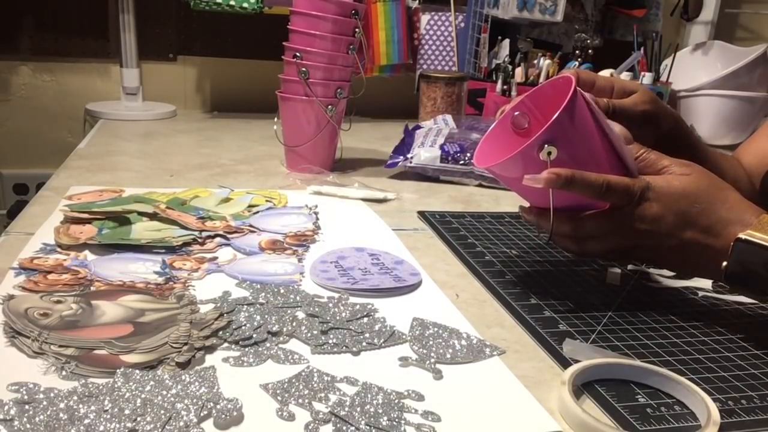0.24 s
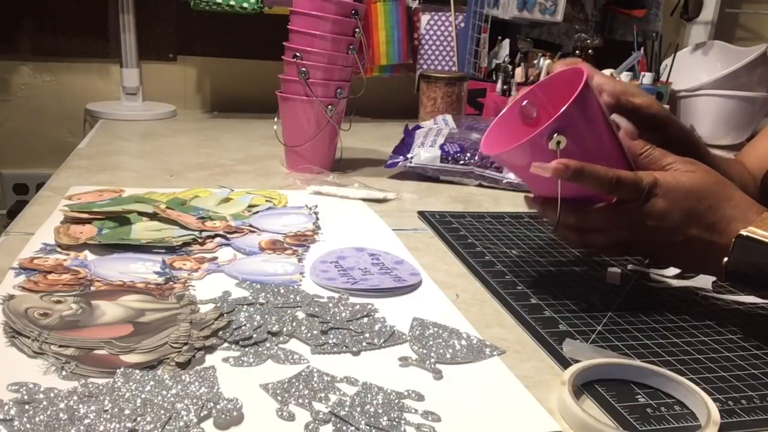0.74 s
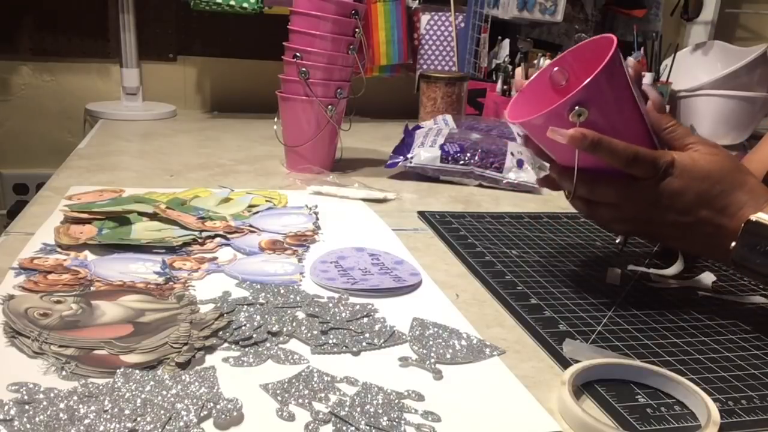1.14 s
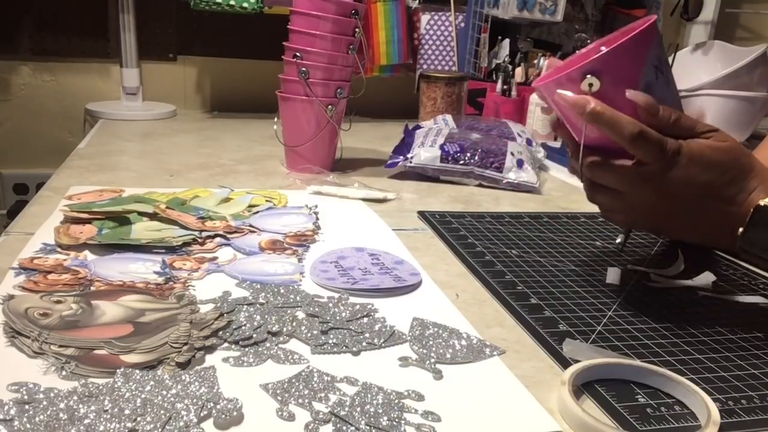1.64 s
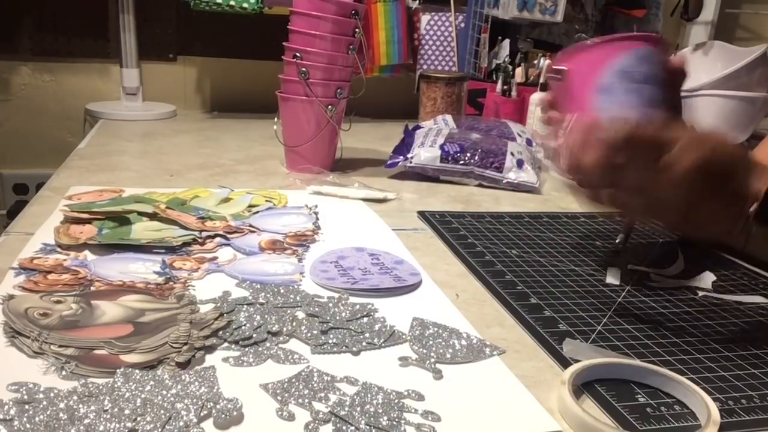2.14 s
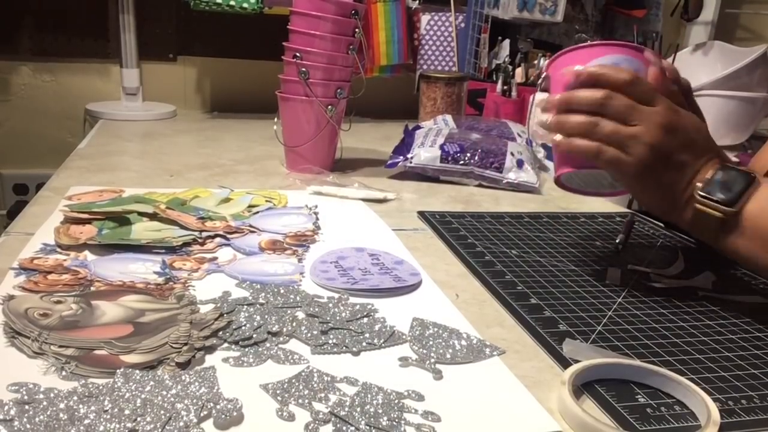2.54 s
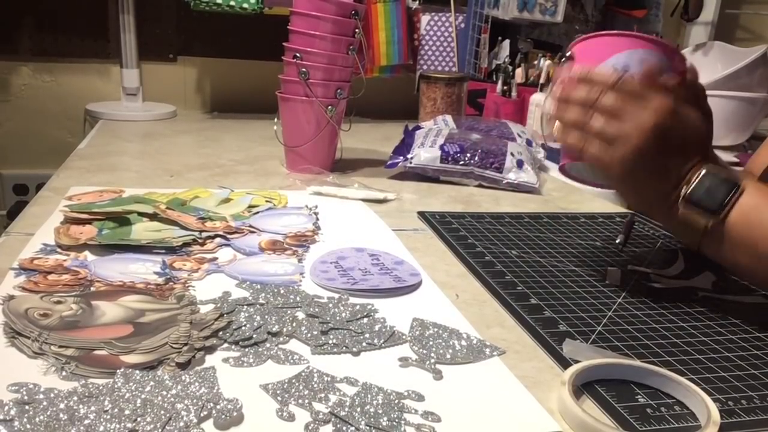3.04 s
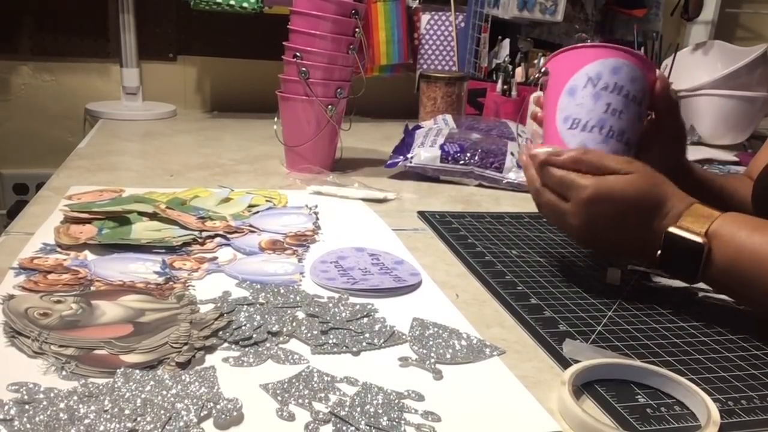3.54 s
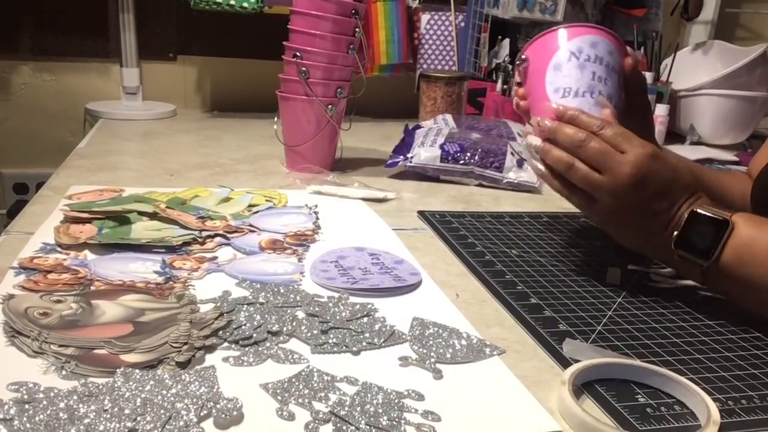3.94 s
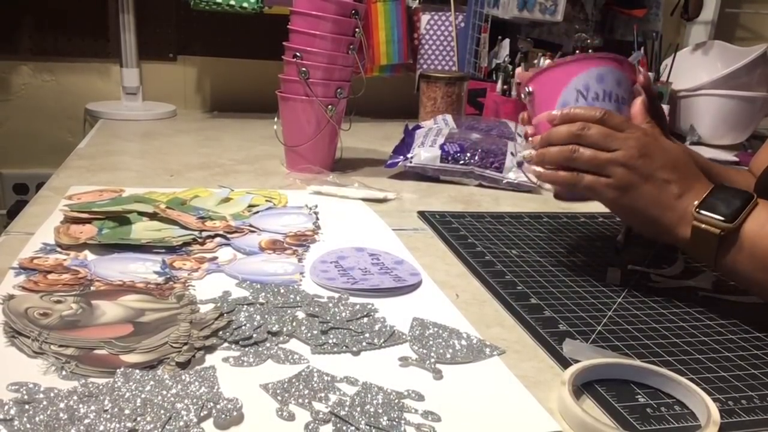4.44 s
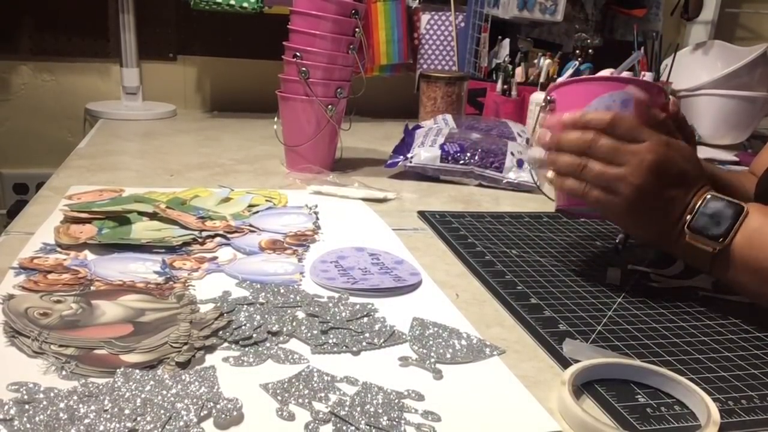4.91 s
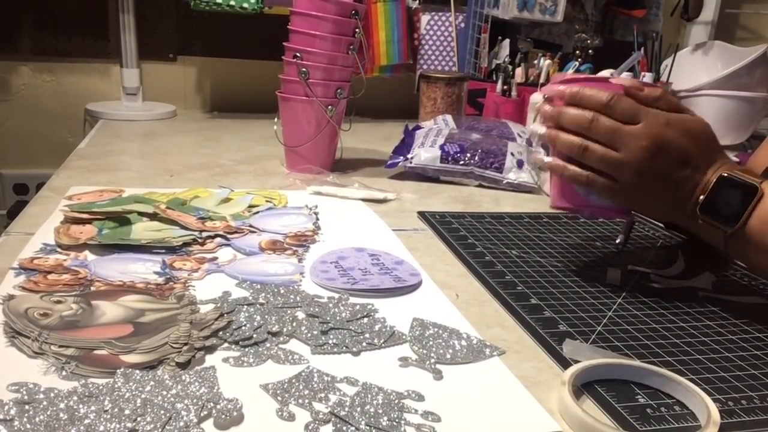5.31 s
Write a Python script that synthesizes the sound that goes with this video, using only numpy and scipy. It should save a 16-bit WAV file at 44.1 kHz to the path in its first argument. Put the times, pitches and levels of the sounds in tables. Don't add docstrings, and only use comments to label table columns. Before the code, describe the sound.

A small thin metal pail is turned in two hands indoors, its wire handle clinking and rattling in short bursts over faint hum.

```python
import sys
import numpy as np
from scipy import signal
from scipy.fft import rfft, irfft
from scipy.io import wavfile
from scipy.ndimage import uniform_filter1d

SR = 44100
rng = np.random.default_rng(int(sys.argv[2]) if len(sys.argv) > 2 else 0)


def digitize_waveform(pressure):
    field = np.atleast_2d(pressure).T
    bounded = np.clip(field, -1, 1)
    quanta = np.round(bounded * 32767).astype(np.int16)
    wavfile.write(sys.argv[1], SR, quanta)


def volts_from_db(level):
    exponent = np.asarray(level, float) / 20
    return 10 ** exponent


N = 245813
SPLIT_HZ = 1800, 6000


def fade(t, t60):
    return np.exp(-np.log(1000) * t / max(t60, 1e-3))


def unit(x):
    return x / np.sqrt(np.mean(x ** 2))


def colour(x, points):
    hz, db = np.transpose(points)
    f = np.maximum(np.fft.rfftfreq(len(x), 1 / SR), 1)
    return irfft(rfft(x) * volts_from_db(np.interp(np.log(f), np.log(hz), db)), len(x))


def ring(x, hz, t60):
    pole = np.exp(2j * np.pi * hz / SR - np.log(1000) / (max(t60, 1e-3) * SR))
    return signal.lfilter([0, pole.imag], [1, -2 * pole.real, abs(pole) ** 2], x)


def walk(rate):
    hold = int(SR / rate)
    steps = np.repeat(rng.standard_normal(N // hold + 1), hold)
    return unit(uniform_filter1d(uniform_filter1d(steps, hold), hold)[:N])


def registers(points, count):
    bands = []
    for hz, kind in (SPLIT_HZ[0], "low"), (SPLIT_HZ, "band"), (SPLIT_HZ[1], "high"):
        noise = colour(rng.standard_normal(count), points[:-1])
        sos = signal.butter(2, hz, kind, fs=SR, output="sos")
        bands.append(unit(signal.sosfilt(sos, noise)))
    return bands


STRIKES = [(0.9012, -36, 6.5, 0.044), (1.103, -30.5, -4, 0.06), (1.1675, -40, -1, 0.065),
           (1.2337, -31, -2.5, 0.024), (1.6615, -57, 12, 0.035), (2.03, -27, -6.5, 0.014),
           (2.0075, -52.5, -3.5, 0.022), (1.831, -34, 2.5, 0.064), (1.9287, -23.5, 4.5, 0.015),
           (1.932, -21.5, -15, 0.075), (1.966, -28, -17, 0.055), (2.146, -31, -5.5, 0.065),
           (2.201, -11, -5.5, 0.036), (2.2437, -29.5, 2, 0.067), (3.027, -41.5, 10.5, 0.011)]
RATTLES = [(0.6796, -44.5, -25, 0.056), (0.811, -48.5, -14, 0.051), (0.9256, -29, 11, 0.01),
           (1.112, -32, -1.5, 0.016), (1.199, -65, -4, 0.021), (1.2454, -59, -8, 0.033),
           (1.8187, -40, -34, 0.042), (1.852, -32.5, -8, 0.13), (1.879, -30, -7.5, 0.038),
           (1.9426, -20.5, -10, 0.023), (1.9868, -28, -1, 0.065), (2.024, -23.5, -3.5, 0.032),
           (2.094, -28.5, -19, 0.07), (2.395, -39, -8, 0.038), (2.534, -30.5, 2.5, 0.12),
           (3.196, -37, 6, 0.052), (3.983, -53, 2, 0.05), (4.6606, -40.5, -3.5, 0.032),
           (5.26, -34, 2.5, 0.094), (5.4094, -22, -3.5, 0.014), (5.419, -38.5, -7, 0.071),
           (2.5185, -30, 1, 0.024), (2.471, -36.5, 1, .05), (5.268, -39, 2, 0.028)]
TAPS = [(0.7205, -55.5, -29, 0.086), (2.379, -28, 0.5, 0.051), (2.511, -21, -1, 0.036),
        (2.9044, -31.5, 0, 0.082), (3.12, -41, -8, 0.032), (3.1421, -28, -3, 0.032),
        (3.461, -45.5, -7.5, 0.099), (3.615, -47.5, -2.5, 0.07), (3.998, -39.5, -9, 0.052),
        (4.062, -41.5, -13, 0.17), (4.755, -54, -18, 0.18), (4.996, -42.5, -5.5, 0.12),
        (5.056, -42, -11.5, 0.087), (5.399, -44, 1, 0.03)]
SLIDES = [
    (0.8755, -38.5, -6.5, 0.073),
    (1.053, -38, -2.5, 0.093),
    (1.763, -40.5, -11.5, 0.1),
    (2.347, -34, 0.5, 0.34),
    (2.463, -28.5, -2, 0.062),
    (3.173, -32, -2, 0.054),
    (4.2088, -57, 0, 0.071),
    (4.6493, -35, -11, 0.064),
    (4.807, -37.5, -10, 0.13),
]
# (rise [s], dull body share [dB])
KINDS = [
    (0.001, -30.5),
    (0.0045, -22.5),
    (0.001, -8),
    (0.0072, -16.5),
]
# (frequency [Hz], level [dB])
CRACK = [(410, -21), (560, -13), (780, -8.5), (1050, -21), (1340, -12), (1670, -12.5), (2100, -9.5),
         (3080, 0), (3460, -6), (4260, -2), (6100, -8), (7440, -6), (11100, -8), (15600, -17)]


def contacts():
    t = np.arange(6144) / SR
    count = N + len(t)
    noises = body, mid, high = registers(CRACK, count)
    grit = volts_from_db(4.5 * unit(uniform_filter1d(rng.standard_normal(count), size=50)))
    push = rng.standard_normal(count)
    mode_hz, mode_db = np.transpose(TIN)
    place = np.digitize(mode_hz, SPLIT_HZ)
    out = ticks(noises, count)
    for table, (rise, body_db) in zip((STRIKES, RATTLES, TAPS, SLIDES), KINDS):
        for s, db, high_db, t60 in table:
            at = slice(int(s * SR), int(s * SR) + len(t))
            spot, bend = rng.standard_normal((2, len(TIN)))
            swell = volts_from_db(db) * (1 - np.exp(-t / max(rise, 1e-4))) ** 2
            blow = fade(t, 0.00086 + 8 * rise)
            chatter = volts_from_db(-7) * grit[at] * fade(t, t60)
            force = swell * (blow + chatter)
            weight = swell * (blow + volts_from_db(-9.5) * chatter)

            share = volts_from_db(np.array([body_db + 10.5, 0, high_db + 6]))
            out[at] += volts_from_db(-12) * weight * share[0] * body[at]
            out[at] += volts_from_db(-12) * force * (mid[at] + share[2] * high[at])

            gains = share[place] * volts_from_db(1.03 * mode_db + 2.2 * spot + 1.5)
            out[at] += wall(force * push[at], gains, 1 + 0.01 * bend, t60=0.025)
    return out[:N]


# (frequency [Hz], level [dB])
TIN = [(1715, -3), (2450, -3.5), (2990, -5), (3230, -7.5), (3800, -12.5), (4100, -7.5), (4450, -9),
       (4810, -13), (5400, -9.5), (6600, -10.5), (6850, -9.5), (8100, -8), (8390, -3.5), (9500, -4),
       (10850, -4.5), (12150, -6.5)]


def wall(x, gains, detune, t60):
    f = np.fft.rfftfreq(len(x), 1 / SR)
    hz = np.array(TIN)[:, :1] * detune[:, None]
    width = np.log(1000) / (2 * np.pi * t60) * np.maximum(hz / 3500, 1) ** 1.2
    response = np.sum(gains[:, None] * width / (width + 1j * (f - hz)), axis=0)
    return irfft(rfft(x) * response, len(x))


# (time [s], level [dB], treble share [dB])
TICKS = [(0.9017, -40, -9), (0.9273, -37.5, -5), (1.108, -37.5, -8), (1.112, -39.5, -3), (1.2343, -41.5, 1),
         (1.6646, -61.5, 12), (1.838, -41, -2), (1.9296, -33, 5), (1.934, -36, -4), (1.9457, -29.5, -6),
         (1.958, -51, -4), (1.97, -34.5, -3), (1.99, -33.5, -4), (2.008, -45.5, -8), (2.0276, -35.5, -14),
         (2.035, -38, -2), (2.209, -47, -2), (2.217, -38, 5), (2.3543, -45, 7), (2.383, -38, -6),
         (2.403, -39.5, 2), (2.465, -45, -2), (2.4704, -47, -6), (2.5133, -35, -7), (2.52, -39, -9),
         (2.528, -37, 2), (2.541, -38, 0), (2.9066, -38.5, -2.5), (2.912, -49, 3), (3.0267, -49, 8),
         (3.034, -56, 16), (3.041, -61, 16), (3.197, -43, -5), (3.623, -53, -6), (4.821, -49, -9),
         (5.004, -52, -10), (5.064, -48.5, -15), (5.2647, -37.5, -5), (5.29, -45, 4), (5.4133, -35, -7),
         (5.422, -50, -8)]


def ticks(noises, count):
    body, mid, high = noises
    out, t = np.zeros(count), np.arange(6144) / SR
    peak_s = 0.00052
    pulse = t / peak_s * np.exp(1 - t / peak_s)
    for s, db, high_db in TICKS:
        at = slice(int(s * SR), int(s * SR) + len(t))
        out[at] += volts_from_db(db) * pulse * (mid[at] + volts_from_db(high_db) * high[at] + volts_from_db(-14) * body[at])
    return out


# (time [s], level [dB],
# frequency [Hz], t60 [s])
RINGS = [(0.901, -44, 4750, .04), (0.901, -29, 3160, .04), (0.908, -33, 2520, 0.085),
         (0.929, -34.5, 4770, 0.079), (0.931, -47, 5545, 0.087), (0.932, -45, 2450, 0.1),
         (0.953, -57, 3000, 0.25), (1.058, -46, 2430, 0.14), (1.058, -43, 3050, 0.24),
         (1.062, -42, 5350, 0.17), (1.105, -34, 2590, 0.04), (1.113, -25.5, 5430, 0.032),
         (1.113, -46, 4100, 0.072), (1.665, -59, 4500, 0.84), (1.932, -16, 4400, 0.033),
         (1.944, -28, 2994, .3), (1.948, -27.5, 2450, 0.47), (1.962, -32, 2990, .3),
         (1.968, -31, 4850, .08), (2.0, -34, 2490, 0.38), (2.005, -33, 3100, 0.055),
         (2.018, -30, 3160, 0.05), (2.202, -12, 2620, 0.024), (2.208, -22, 4680, 0.089),
         (2.21, -31, 3220, 0.21), (2.215, -34, 4410, 0.23), (2.245, -46, 8100, 0.15),
         (2.378, -36, 2970, 0.081), (2.513, -35.5, 1713, .26), (2.513, -36, 3060, .15),
         (2.518, -28.5, 4134, 0.24), (2.52, -32, 5378, 0.19), (2.513, -29, 6756, 0.15),
         (2.908, -36.5, 3940, .3), (2.906, -35, 6800, 0.14), (2.912, -41, 8360, .15),
         (3.028, -34.5, 4280, 0.037), (3.028, -41, 2080, 0.027), (3.198, -40, 6500, 0.11),
         (3.198, -46.5, 2500, 0.11), (5.264, -32.5, 6880, 0.047), (5.266, -34, 4090, 0.28),
         (5.268, -37.5, 5400, 0.22), (5.277, -40, 3040, 0.23), (5.413, -20.5, 2645, 0.021),
         (5.413, -44, 6900, 0.12), (5.416, -38, 3020, 0.13), (5.425, -58, 5000, 0.15),
         (1.735, -57, 4500, .25), (1.764, -48, 3200, 0.087), (1.775, -45, 4450, .12),
               (1.778, -53, 2940, 0.11), (1.78, -55, 1716, 0.13), (1.817, -41.5, 3100, 0.094),
               (1.817, -48, 3950, .08), (1.832, -33.5, 4000, .06), (1.832, -38, 2516, .08),
               (1.833, -37, 8230, .15), (1.851, -39, 3050, 0.12), (1.847, -36.5, 4560, 0.11),
               (1.882, -40, 2490, 0.09), (3.461, -50, 3035, 0.092), (3.543, -55, 2900, .03),
               (3.615, -48, 2584, .1), (3.617, -51, 5030, 0.067), (4.653, -51, 2700, .08),
               (4.664, -45, 3045, 0.085), (4.663, -51, 3960, 0.13), (4.755, -53, 2600, .1),
               (4.812, -52, 3040, 0.16), (4.812, -42.5, 6610, 0.087), (4.815, -42, 5500, .08),
               (4.996, -43, 2570, 0.048), (5.005, -46.5, 3100, .08), (5.062, -57, 2820, 0.078),
               (5.399, -42, 5400, .04), (5.399, -46, 6800, .06), (5.428, -39, 6840, .1),
               (3.178, -43, 4190, .15), (3.116, -44.5, 2550, 0.05), (3.69, -56, 2700, .06)]


def rings():
    out, t = np.zeros(N + SR // 4), np.arange(SR // 4) / SR
    longest_t60_s, gripped_s = 0.22, 0.085
    touch = walk(150)
    shake = 0.8 + touch + 1j * touch[::-1]
    span = 3 * len(t)
    for k, (s, db, hz, t60) in enumerate(RINGS):
        size = volts_from_db(db - 13) * (1 - np.exp(-t / 0.00062)) * fade(t, min(t60, longest_t60_s))
        size = size * np.exp(-(t / gripped_s) ** 4)
        start = k * 4096 % (N - span)
        flutter = shake[start:start + span:3]
        out[int(s * SR):][:len(t)] += size * (flutter * np.exp(2j * np.pi * hz * t)).imag
    return out[:N]


# (time [s], level [dB], frequency [Hz])
PINGS = [(0.9014, -41, 3900), (0.9272, -20.5, 3005), (1.1677, -39, 3110), (1.2342, -40, 3150),
         (1.2445, -43, 3300), (1.7753, -50, 4570), (1.8326, -28.5, 3070), (0.9275, -28, 5320),
         (1.9644, -27, 3130), (2.0258, -27.5, 4650), (2.0971, -51, 2860), (2.147, -37, 3160),
         (2.2022, -15, 5310), (2.5117, -38, 2900), (2.5117, -28, 5360), (2.9062, -27.5, 3740),
         (3.1196, -47, 2520), (3.1429, -31, 2520), (3.179, -41, 4190), (2.2022, -18, 3210),
         (3.616, -44, 3110), (4.0624, -44.5, 4660), (4.6633, -42, 3960), (4.7556, -48, 2480),
         (1.9895, -45, 2620), (2.2028, -19, 4170), (5.0635, -43.5, 1790), (5.2639, -26, 2510),
         (5.2764, -46, 3020), (5.4142, -27, 3940), (5.265, -27.5, 6920), (5.265, -53, 4900),
         (5.4135, -51, 5700), (5.4135, -30, 2540), (5.4135, -41, 6830), (5.42, -33, 3140),
         (2.0265, -23, 3230), (1.933, -24, 3060), (2.5125, -29, 3030), (2.9065, -34, 2420),
         (1.1045, -40, 2100), (3.199, -38, 2560), (1.1135, -43, 3250), (2.033, -33, 4770),
         (1.99, -32, 3100), (2.382, -38, 2000), (2.403, -43, 3260), (5.271, -46, 5400), (5.29, -41, 3000)]
# (time [s], level [dB], frequency [Hz])
BELLY = [(0.9283, -51, 1750), (1.7766, -54, 1730), (1.957, -53, 1830), (2.2039, -40, 1750),
         (2.377, -39.5, 1943), (2.5104, -41, 1750), (2.9044, -41.5, 1727), (3.1414, -43, 1673),
         (3.1855, -43, 1716), (3.462, -58, 1780), (3.6166, -54.5, 1743), (4.0642, -59.5, 1830),
         (4.813, -53.5, 1770), (5.004, -52, 1830), (5.2627, -41, 1776), (5.4134, -41, 1704),
         (1.9455, -39, 2990), (2.0255, -36.5, 2530), (2.5283, -43, 4140)]


def pings():
    out, t = np.zeros(N + SR // 5), np.arange(SR // 5) / SR
    for table, t60_s in (PINGS, 0.017), (BELLY, 0.06):
        envelope = (1 - np.exp(-t / 0.00051)) * fade(t, t60_s)
        for s, db, hz in table:
            out[int(s * SR):][:len(t)] += volts_from_db(db - 3.5) * envelope * np.sin(2 * np.pi * hz * t)
    return out[:N]


# (time [s], level [dB], contact length [s], other modes against the longest
# [dB])
TINKLES = [(0.894, -23.5, 0.024, -23), (0.922, -26.5, 0.015, -8.5), (0.956, -68.5, 0.0096, 26),
           (1.047, -58, 0.014, -16), (1.102, -43, 0.0052, 1), (1.196, -42.5, 0.018, 3.5),
           (1.199, -31, 0.033, -21), (1.236, -39.5, 0.012, -10), (1.27, -51, 0.0092, -8),
           (1.84, -48.5, 0.029, 2), (1.877, -55, 0.012, 6.5), (1.924, -26, 0.028, -7),
           (1.945, -35, 0.04, -8.5), (1.986, -44.5, 0.019, 5.5), (2.203, -45, 0.048, 1),
           (2.246, -39.5, 0.0069, -2.5), (2.374, -40.5, 0.007, 1.5), (2.525, -30, 0.014, -22),
           (2.929, -45, 0.008, -8), (3.149, -46, 0.0066, 0), (3.182, -44, 0.01, -7)]
# (frequency [Hz], level [dB], t60 [s])
WIRE = [
    (10820, -9, .055),
    (11450, -5, .016),
    (11900, 0, .016),
    (12350, -3, .016),
    (10620, -4, .016),
    (11150, -5, .012),
]


def wire():
    t = np.arange(N) / SR
    longest, others = np.zeros((2, N))
    for s, db, length, others_db in TINKLES:
        at = slice(int(s * SR), int((s + length) * SR) + 1)
        contact = volts_from_db(db - 19) * np.hanning(len(t[at]))
        longest[at] += contact
        others[at] += contact * volts_from_db(others_db)
    forces = [longest] + [others] * (len(WIRE) - 1)
    out = np.zeros(N)
    for force, (hz, db, t60) in zip(forces, WIRE):
        out += volts_from_db(db) * ring(force * rng.standard_normal(N), hz, t60)
    return out


# (time [s], level [dB])
KNOCKS = [(0.694, -62), (0.722, -60.5), (0.765, -71), (0.824, -65), (0.877, -55), (0.928, -50.5),
          (1.052, -76), (1.115, -60), (1.166, -67), (1.204, -60.5), (1.234, -60), (1.575, -72),
          (1.614, -72), (1.678, -62.5), (1.719, -75), (1.833, -61), (1.941, -59), (2.029, -54.5),
          (2.238, -53), (2.379, -55), (2.512, -51), (2.525, -42), (2.915, -49), (3.142, -45.5),
          (3.197, -56), (3.619, -68.5), (4.148, -70), (4.19, -64), (4.656, -60.5), (4.816, -68),
          (4.003, -69)]
# (time [s], frequency [Hz])
GRIP = [
    (.6, 600),
    (1.3, 590.5),
    (2, 608),
    (2.5, 585.6),
    (2.9, 588),
    (3.2, 586.4),
    (4.2, 584),
    (5.4, 600.5),
]


def shell(hum_gain):
    t = np.arange(N) / SR
    phase = 2 * np.pi * np.cumsum(np.interp(t, *np.transpose(GRIP))) / SR
    shaken = walk(70) * np.sin(phase) + walk(70) * np.cos(phase)
    blows, span = np.zeros(N + SR // 4), t[:SR // 4]
    envelope = (1 - np.exp(-span / 0.0012)) * fade(span, 0.17)
    for s, db in KNOCKS:
        blows[int(s * SR):][:len(span)] += volts_from_db(db + 1) * envelope
    return hum_gain * shaken + blows[:N] * (np.sin(phase) + 0.1 * shaken)


# (time [s], rub level [dB])
RUB = [(0.0, -77), (0.57, -73), (0.68, -68), (1.27, -79), (1.45, -67.5), (1.85, -64), (2.1, -58),
       (2.28, -68), (2.4, -72), (2.6, -54.5), (2.73, -74), (2.93, -59), (3.26, -61.5), (3.6, -73),
       (4.02, -73.5), (4.4, -69.5), (5.2, -71), (5.57, -62)]
# (middle time [s], length [s], rub level [dB], treble rub level [dB], shell hum level [dB])
STROKES = [(0.753, 0.094, -99, -79, -73), (0.918, 0.13, -58, -59, -77), (1.125, 0.14, -67, -75, -78),
           (1.175, 0.1, -80, -58, -81), (1.392, 0.12, -62.5, -56, -100), (1.63, 0.14, -64.5, -62, -75.5),
           (1.993, 0.096, -46, -39, -59.5), (2.376, 0.048, -48, -63, -71), (2.483, 0.069, -50, -61, -62),
           (2.718, 0.17, -59.5, -57, -88), (3.108, 0.095, -64, -59, -85), (3.49, 0.066, -85, -67, -84),
           (3.625, 0.073, -93, -63.5, -94), (4.245, 0.078, -82, -64, -75), (4.397, 0.15, -78, -65.5, -80),
           (4.598, 0.22, -79, -63, -85), (5.044, 0.15, -64, -65, -101), (5.3, 0.094, -61, -53.5, -99)]


def hands():
    t = np.arange(N) / SR
    rest_db = -70
    rub_db = np.interp(t, *np.transpose(RUB))
    press = rub_db - rest_db
    gains = volts_from_db(np.array([rub_db - 9.5, 1.46 * press - 78, 0.94 * press - 84.5]))
    for middle, length, *db in STROKES:
        at = slice(int((middle - 2 * length) * SR), int((middle + 2 * length) * SR))
        swell = np.exp(-(2 * (t[at] - middle) / length) ** 2)
        gains[:, at] += volts_from_db(np.array(db) - (8, 0.5, 1.5))[:, None] * swell
    return gains


# (frequency [Hz], level [dB])
SKIN = [(530, 1.5), (900, -7), (1740, 0.5), (1910, -6.5), (2830, 1.5), (6610, 0), (7180, -1.5),
        (12900, 1.5), (15600, -6)]


def palms(mid_gain, high_gain):
    body, mid, high = registers(SKIN, N)
    tin = unit(sum(volts_from_db(db) * ring(mid, hz, 0.014) for hz, db in TIN if hz < SPLIT_HZ[1]))
    hiss = mid_gain * (mid + volts_from_db(-10) * tin + volts_from_db(-13) * body) + high_gain * high
    return volts_from_db(1.5 * walk(25)) * hiss


# (time [s], level [dB], frequency [Hz], t60 [s])
THUMPS = [(0.309, -58, 268, 0.061), (1.943, -52, 83, 0.034), (2.204, -49, 380, 0.014),
          (2.352, -34, 196, 0.017), (1.8, -70, 298, 0.025), (2.2, -48, 1035, 0.015),
          (3.144, -63, 400, 0.027), (5.265, -40.5, 1030, 0.013), (5.266, -54.5, 294, 0.022),
          (2.513, -40.5, 1160, 0.017), (1.106, -54.5, 818, 0.059), (0.895, -57.5, 770, 0.063),
          (0.93, -64, 820, 0.088), (5.264, -51, 1800, 0.015), (5.413, -39, 1900, 0.015),
          (3.143, -49, 1120, 0.015), (5.414, -34, 1030, 0.0056)]


def thumps():
    out, t = np.zeros(N + SR // 10), np.arange(SR // 10) / SR
    for s, db, hz, t60 in THUMPS:
        envelope = (1 - np.exp(-t / 0.00055)) * fade(t, t60)
        out[int(s * SR):][:len(t)] += volts_from_db(db) * envelope * np.sin(2 * np.pi * hz * t)
    return out[:N]


def room(x):
    t, step = np.arange(SR // 3) / SR, SR // 8
    t60_s, gap_s, level_db = 0.16, 0.0026, -3
    shape = fade(t, t60_s) * (1 - np.exp(-(t / gap_s) ** 2))
    shape = volts_from_db(level_db) * shape / np.sqrt(np.sum(shape ** 2))
    out = np.append(x, np.zeros(len(t)))
    for i in range(0, N, step):
        wet = signal.fftconvolve(x[i:i + step], shape * rng.standard_normal(len(t)))
        out[i:i + len(wet)] += wet
    return out[:N]


# (frequency [Hz], level [dB per Hz])
AIR = [(24, -38), (40, -4.5), (103, -13.5), (160, -6.5), (196, -8), (216, -15), (263, -16.5), (392, -21),
       (502, -25.5), (728, -26.5), (1320, -29), (1460, -30.5), (1960, -29.5), (10900, -39), (15000, -56)]
# (frequency [Hz], level [dB rms])
HUM = [
    (96.9, -68.5),
    (193.8, -63.5),
]


def background():
    t = np.arange(N) / SR
    hiss_top = [(14600, -48.5), (15500, -47)]
    air = volts_from_db(-67.5) * unit(colour(rng.standard_normal(N), AIR[:-1] + hiss_top))
    hum = np.zeros(N)
    for hz, db in HUM:
        hum += volts_from_db(db - 4 + 3.2 * walk(8.3)) * np.sin(2 * np.pi * hz * t + 0.8 * walk(9))
    return air + hum


def scene():
    lone = pings() + rings() + volts_from_db(1.5) * wire()
    rub, treble, hum = hands()
    pail = room(contacts() + thumps() + 0.35 * lone) + 0.65 * lone
    return (pail + shell(hum) + palms(rub, treble) + background())[None]


def roll_off(x):
    return signal.sosfilt(signal.butter(12, 16460, fs=SR, output="sos"), x)


# (frequency [Hz], level [dB])
MIC = [
    (25, -22),
    (45, -10),
    (60, 2),
]
# (frequency [Hz], level [dB])
TOP = [
    (14300, 0),
    (15500, -6),
    (15800, -30),
    (16400, -36),
    (16600, -70),
]


def record(dry):
    rounded = np.tanh(2 * dry[0]) / 2
    mix = colour(rounded, MIC + TOP)[None]
    return roll_off(mix)


dry = scene()
out = record(dry)
digitize_waveform(out)
```